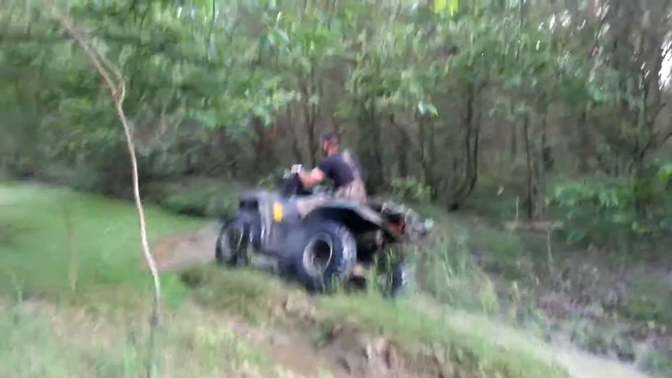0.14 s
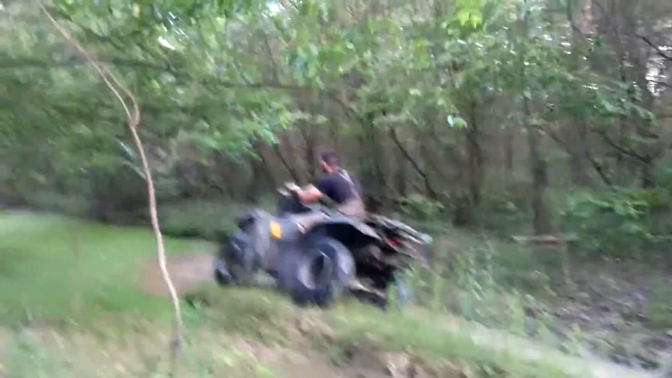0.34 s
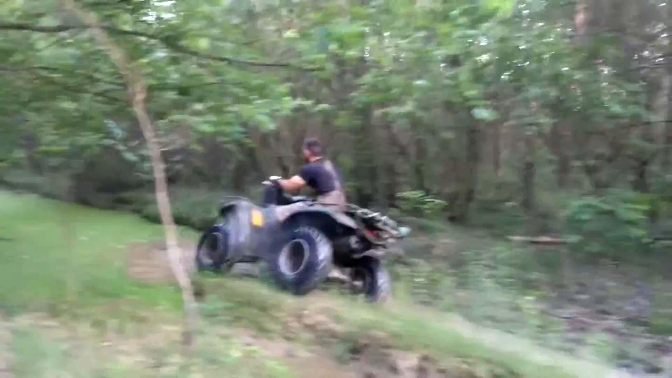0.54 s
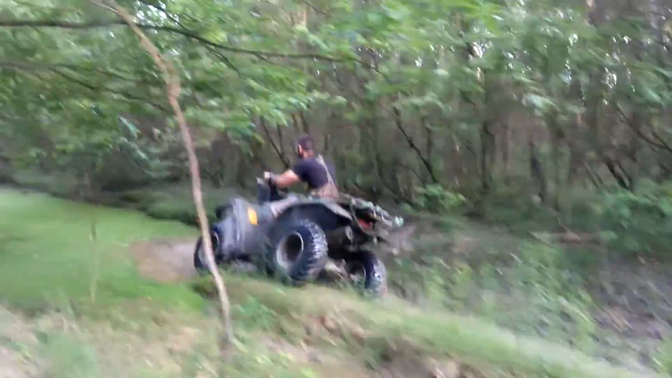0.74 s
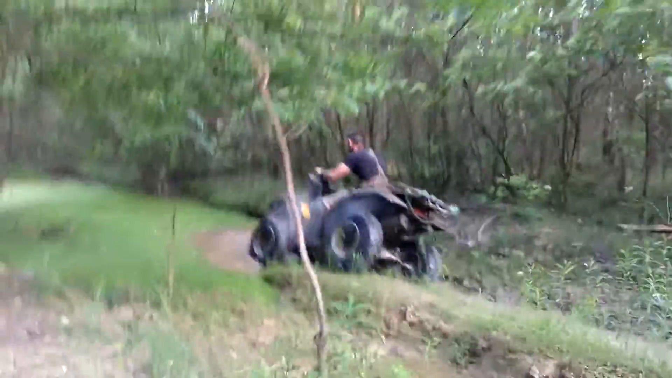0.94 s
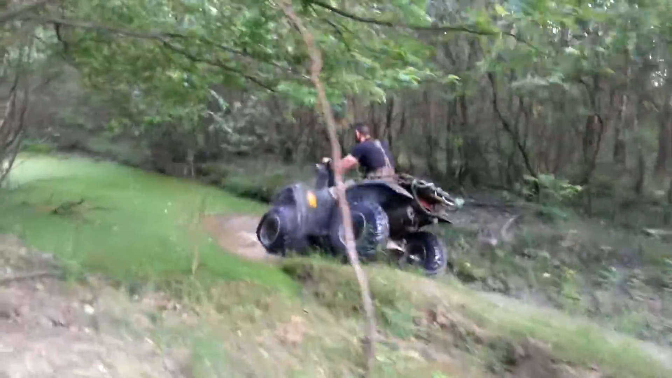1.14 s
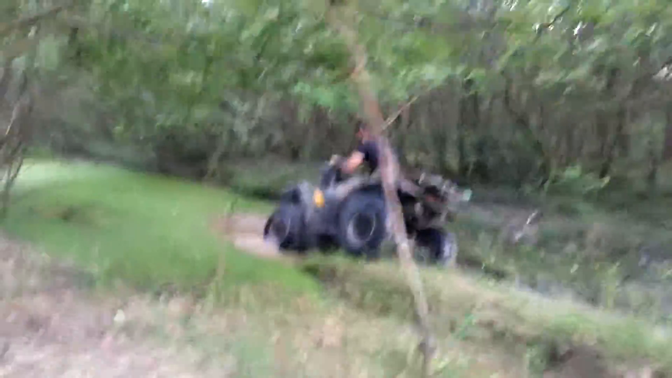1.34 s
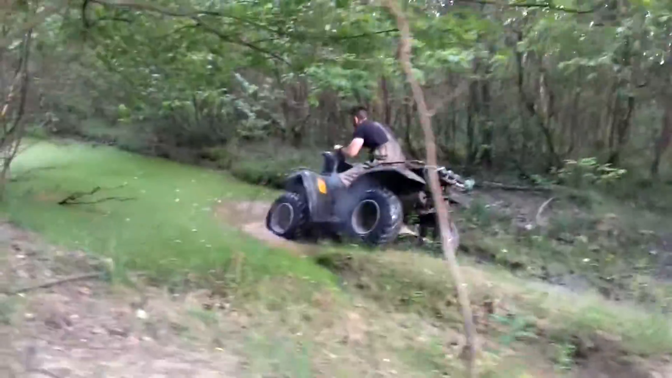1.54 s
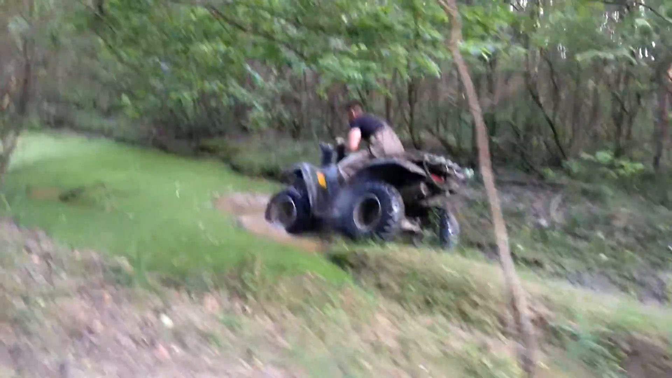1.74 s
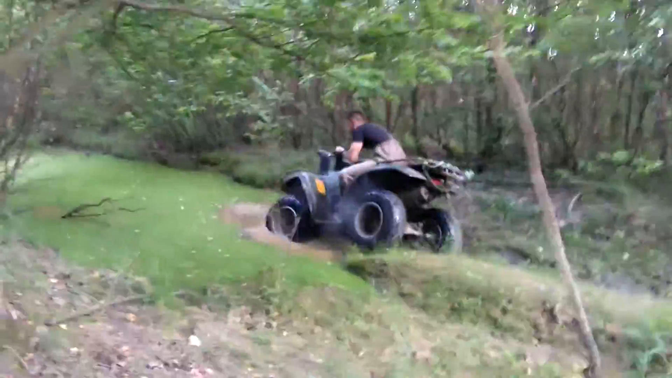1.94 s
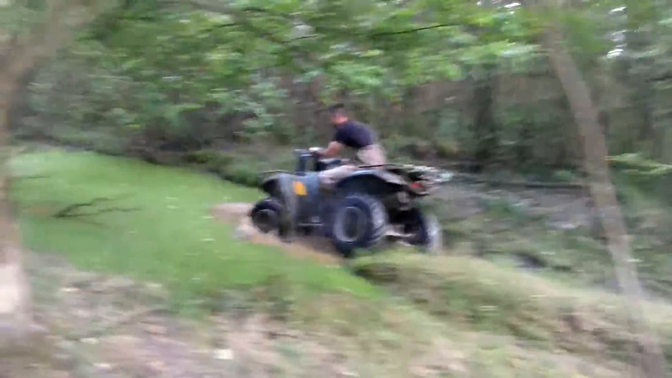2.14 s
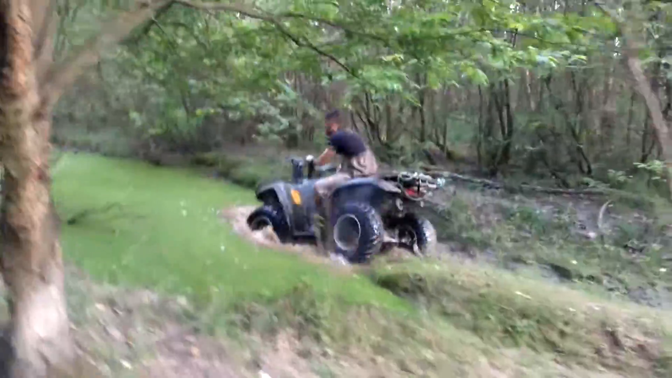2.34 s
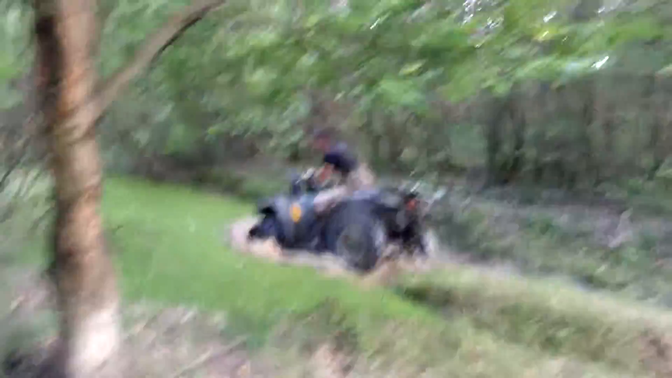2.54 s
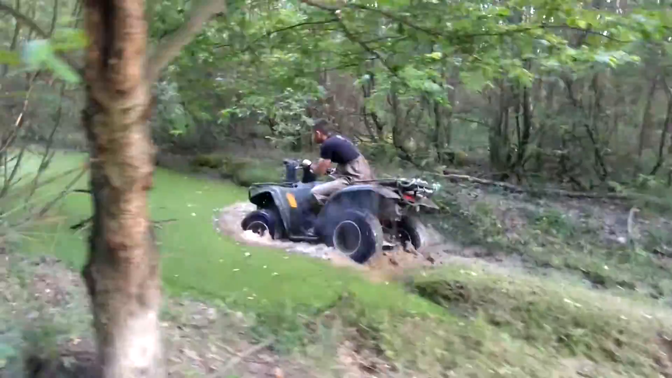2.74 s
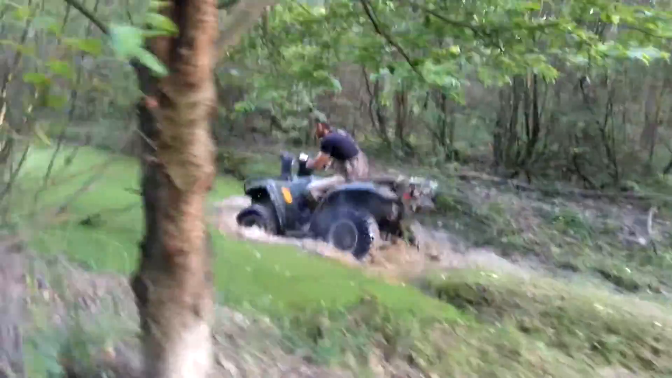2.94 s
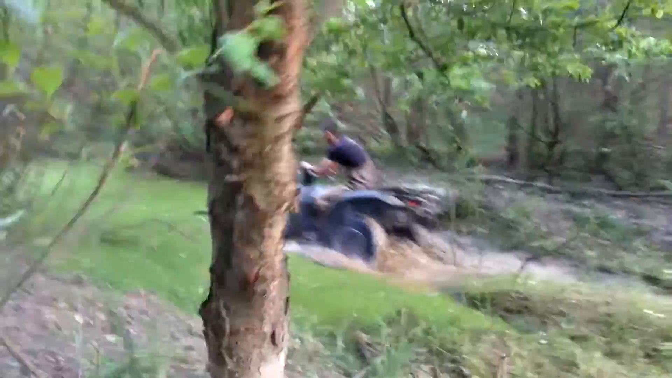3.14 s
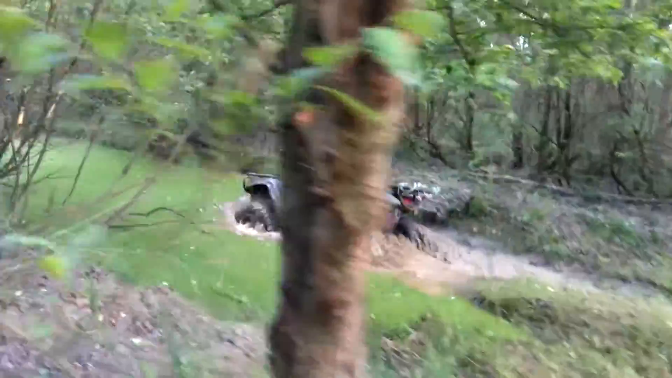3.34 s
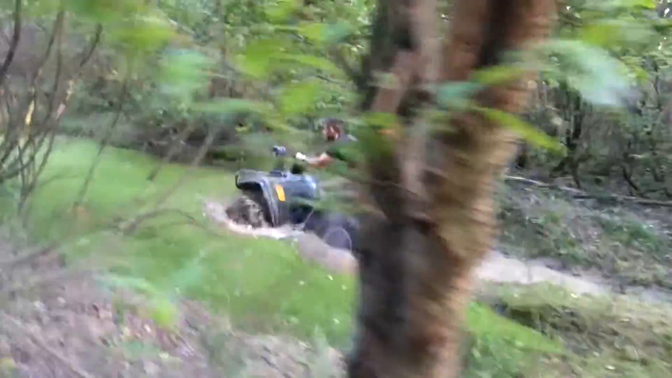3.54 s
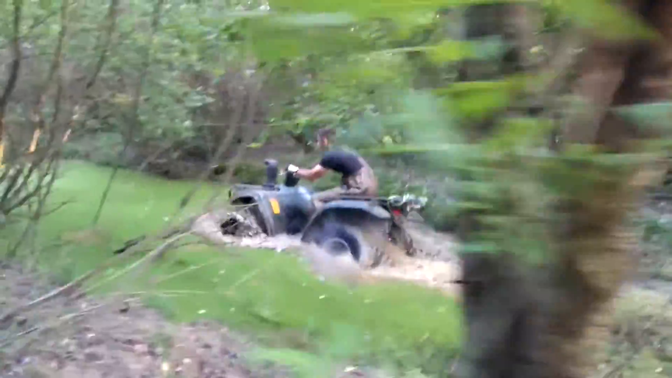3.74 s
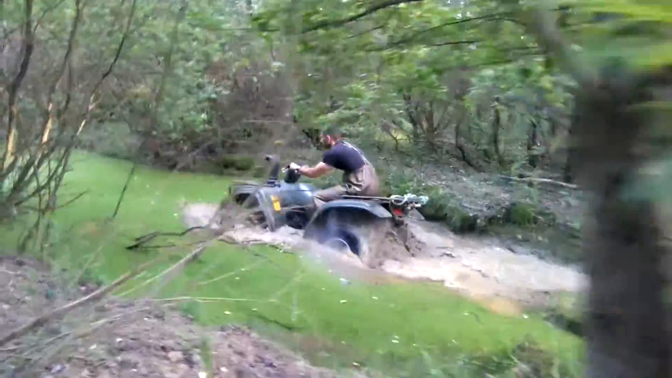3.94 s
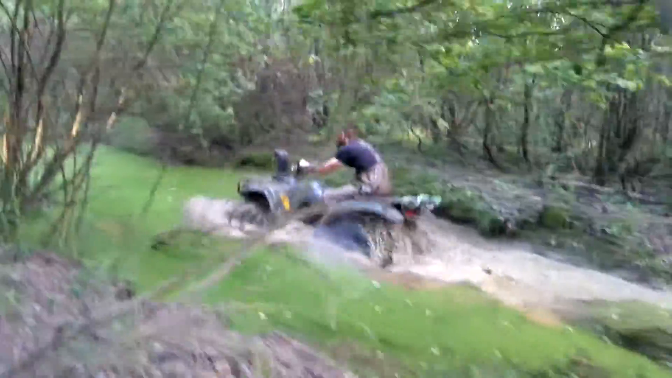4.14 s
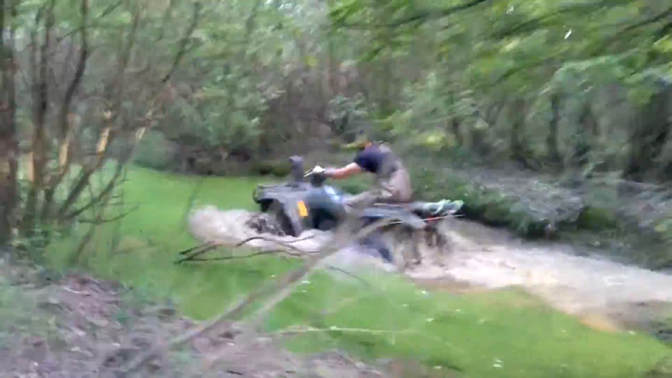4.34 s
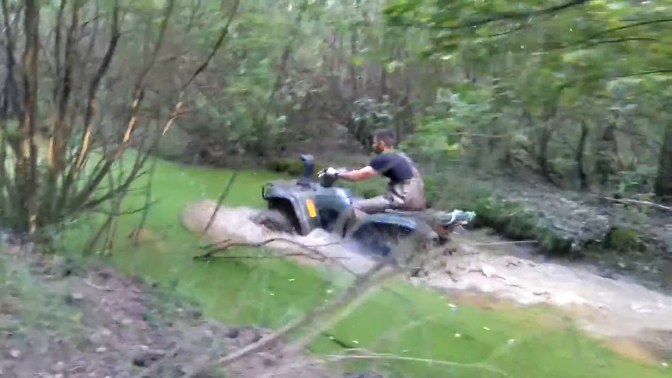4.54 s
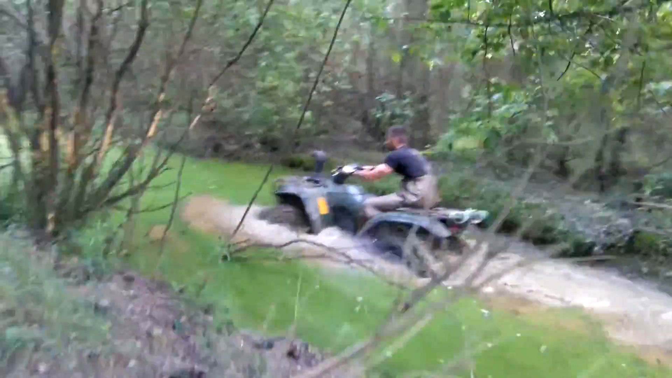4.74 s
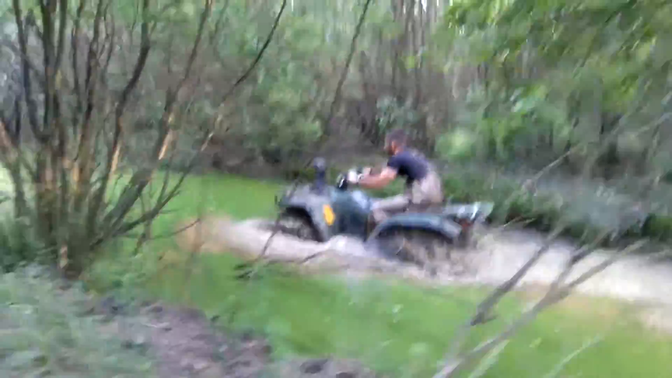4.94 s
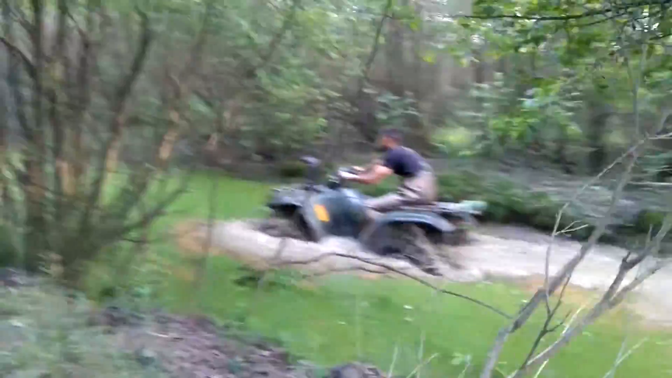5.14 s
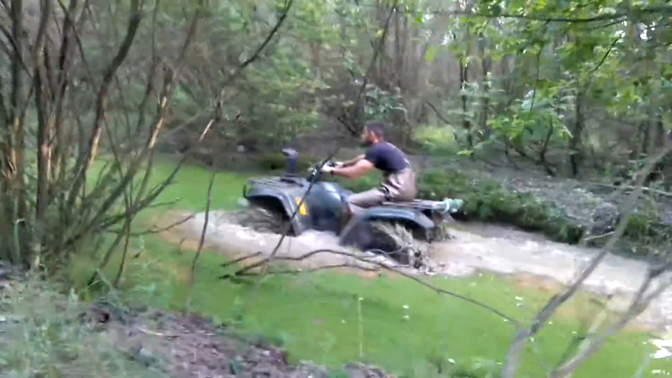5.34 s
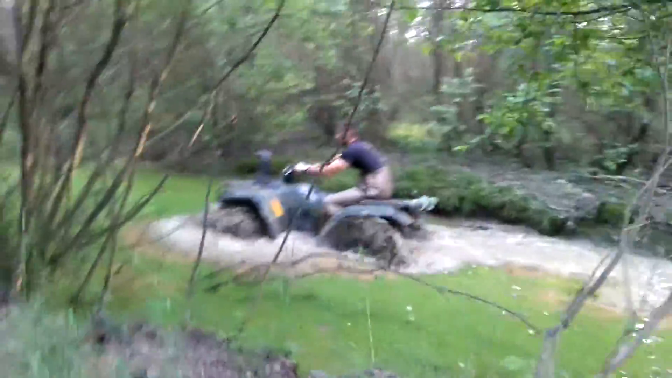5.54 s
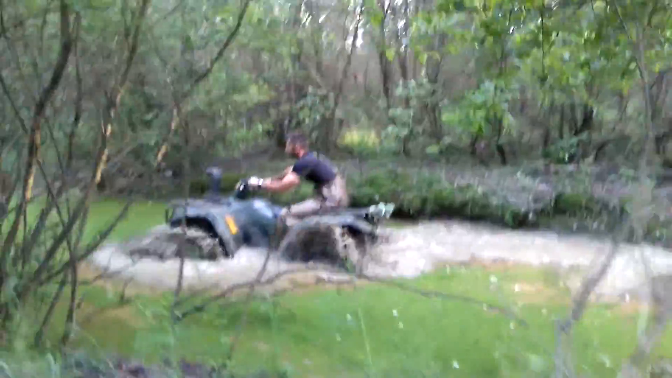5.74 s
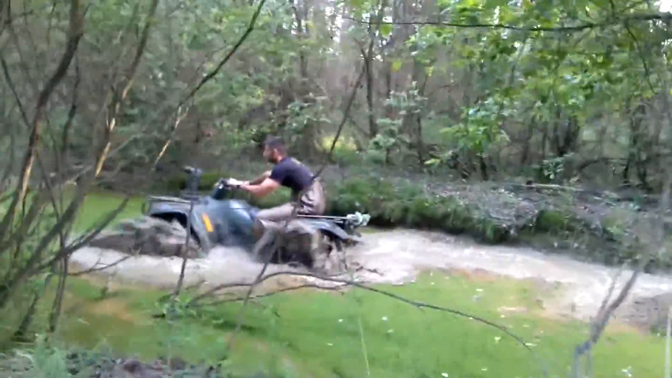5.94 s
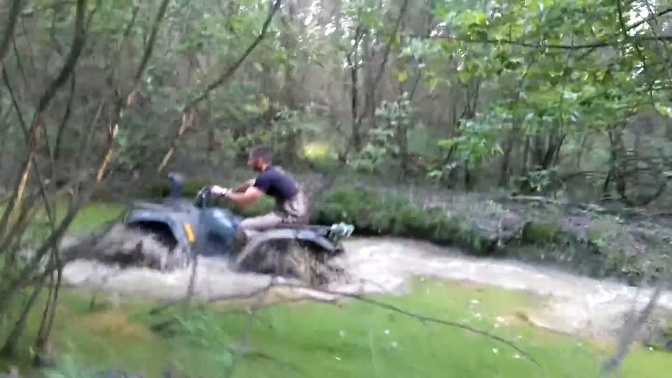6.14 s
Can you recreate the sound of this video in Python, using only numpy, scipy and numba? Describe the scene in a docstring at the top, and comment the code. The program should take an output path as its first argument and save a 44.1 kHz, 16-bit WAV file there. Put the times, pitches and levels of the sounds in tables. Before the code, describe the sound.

Throaty quad bike revs up, drops, revs again, then holds a loud rising blare over a constant wash of thrown water in woodland.

```python
"""A single-cylinder four-stroke quad blips its throttle twice on a bank, then pulls hard through deep muddy
water in a wood. Each firing cracks at the exhaust valve, leaves the silencer a moment later, is pushed on by
the piston and blows a burst of hissing gas through the tailpipe; the intake thumps half a cycle on.
Pulling hard, the pulses merge into a clean note, a sum of sines on the firing rate.
Engine clatter and thrown water, a steady grainy noise, fill the gaps."""
import sys
import numpy as np
from scipy import signal
from scipy.fft import rfft, irfft
from scipy.io import wavfile
from scipy.ndimage import uniform_filter1d
from numba import njit

SR = 44100
rng = np.random.default_rng(int(sys.argv[2]) if len(sys.argv) > 2 else 0)


def transcribe(u):
    """Save the signal u as a 16-bit wav file named by the first command-line argument.

    u: samples, shape (n,) or (channels, n), limited to [-1, 1]; the rate is SR.
    q: integer samples, one column per channel.
    """
    v = np.clip(np.atleast_2d(u).T, -1, 1)
    q = np.round(v * 32767).astype(np.int16)
    wavfile.write(sys.argv[1], SR, q)


N = 273420  # samples, 6.2 s

# Pressure pulses of one engine cycle. Each row: share of the cycle at which it starts, travel time in ms,
# relative strength in dB in the thud, boom, drone (airbox) and bark (header), dB added when the engine
# is slow, and a signed size factor.
CYCLE_PULSES = [(0, 7.21, -12, -9, 6, 8.5, 13.5, 0.25), (0, 15.2, 25, 18, 15.5, 15.5, -4, 0.55),
                (0.37, 6.266, 4, -7.5, -16, -10.5, 19.5, 1.3),
                (0.497, 5.95, -21, -25, 11.5, 12.5, -2, -0.63), (0.76, 7.66, -18, -11, -1, -8, -13, 1.7)]
# Resonances of the header pipe. Each row: centre in Hz, width in Hz, level in dB.
HEADER_MODES = [(528, 139, 0.5), (645, 280, 3), (856, 180, 2.5), (1230, 420, -4.5)]
# The blips also even out at the top. Each row: start and end of the fade in, then of the fade out, in s.
BLIP_TOPS = [(.33, .45, 0.614, .65), (1.864, 1.99, 2.25, 2.27)]
# When the clean note replaces the separate pulses for good: start and end of the fade in seconds.
NOTE_TAKEOVER = (2.71, 2.955)


def from_db(db):
    """Decibels to gain."""
    return 10 ** (np.asarray(db) / 20)


def rms_one(x):
    """Scale to rms 1."""
    return x / np.sqrt(np.mean(x ** 2) + 1e-20)


def evened(x):
    """Scale to rms 1 over a few engine cycles."""
    power = uniform_filter1d(uniform_filter1d(x ** 2, size=SR // 5), size=SR // 5)
    return x / np.sqrt(power + 1e-20)


def in_time(rows):
    """Columns of a curve at every sample; the first column is the time in seconds."""
    s, *columns = np.transpose(rows)
    return [np.interp(np.arange(N) / SR, s, c) for c in columns]


def at_hz(points):
    """A (Hz, value) table on the FFT grid, joined evenly in pitch."""
    hz, value = np.transpose(points)
    return np.interp(np.log(np.fft.rfftfreq(N, 1 / SR) + 1), np.log(hz), value)


def drift(rate_hz):
    """Slow random wandering of spread 1, made at every 40th sample and joined up."""
    r = np.exp(-80 * np.pi * rate_hz / SR)
    slow = signal.lfilter([1], [1, -2 * r, r * r], rng.standard_normal(N // 40 + 2002))[2000:]
    return np.interp(np.arange(N) / 40, np.arange(len(slow)), rms_one(slow))


def resonate(x, modes):
    """Resonances (Hz, width Hz, dB) side by side, signs alternating."""
    out = 0
    for k, (hz, width_hz, db) in enumerate(modes):
        r = np.exp(-np.pi * width_hz / SR)
        poles = [1, -2 * r * np.cos(2 * np.pi * hz / SR), r * r]
        ring = (1 - r * r) / 2 * signal.lfilter([1, 0, -1], poles, x + 1e-18)
        out = out + (-1) ** k * from_db(db) * ring
    return out


@njit
def moving_ring(x, hz, width_hz, rate):
    """A resonance whose centre and width change while it rings."""
    out = np.zeros(len(x))
    for i in range(2, len(x)):
        r = np.exp(-np.pi * width_hz[i] / rate)
        ring = 2 * r * np.cos(2 * np.pi * hz[i] / rate) * out[i - 1] - r * r * out[i - 2]
        out[i] = (1 - r * r) / 2 * (x[i] - x[i - 2]) + ring
    return out


def band(x, low_hz, high_hz):
    """Band-pass."""
    return signal.sosfilt(signal.butter(2, [low_hz, high_hz], "band", fs=SR, output="sos"), x)


def stereo_noise(spectrum_db):
    """Two noises whose likeness depends on pitch, nearly unrelated at the top."""
    # Each row: frequency in Hz, likeness of left and right (0 unrelated, 1 equal).
    left_right_likeness = [(60, 0.19), (150, 0.11), (380, 0.82), (940, 0.66), (2340, 0.48), (5860, 0.037),
                           (14700, 0.043)]
    mid, side = rfft(rng.standard_normal((2, N)))
    alike = np.clip(at_hz(left_right_likeness), 0, 1)
    both = np.sqrt(1 + alike) * mid + np.sqrt(1 - alike) * side * [[1], [-1]]
    return rms_one(irfft(both * from_db(spectrum_db), N))


def struck(events, modes):
    """Clicks at (s, peak dB) set the modes ringing."""
    clicks = np.zeros(N)
    s, db = np.transpose(events)
    clicks[(s * SR).astype(int)] = from_db(db)
    one_click = resonate(signal.unit_impulse(SR // 10), modes)
    return resonate(clicks, modes) / np.abs(one_click).max()


def firings(cycle, share_late):
    """Number of the current firing and the sample where it began, this share of a cycle late."""
    number = np.floor(cycle - share_late).astype(int)
    starts = np.flatnonzero(np.diff(number, prepend=number[0] - 1))
    return number, starts[number - number[0]]


def by_course(rows):
    """Each row's value, moved by the machine's turn and by the water over the silencer."""
    # The way through the wallow. Each row: time in s, tailpipe turned this way (about 0-1),
    # silencer under water (0-1).
    course = [(0, 0, 0), (2.75, 0.36, 0.08), (3.1, 0.74, 0), (3.4, 0.95, 0.3), (3.7, 0.93, 0.25),
              (4, 1, 0.48), (4.4, 1.02, 1), (5, 0.93, 0.7), (5.3, 1, 0.8), (5.65, 0.77, 0.9),
              (6.2, 0.66, 0.9)]
    turned, sunk = in_time(course)
    return [value + by_turn * turned + by_water * sunk for value, by_turn, by_water in rows]


def part_levels(per_s, throttle):
    """Level in dB of every part from speed, throttle and course."""
    # Parts: thud, boom, drone, bark, crack, rasp, jet, clatter. Each row: level in dB when pulling,
    # dB per octave of slower firing, dB with shut throttle, dB when turned this way, dB under water.
    parts = {"thud": (-25, -7, -1.5, -4.5, 1), "boom": (-18, -7, -7.5, 3, -17),
             "drone": (-17, -4.5, -8, -1, 2.5), "bark": (-16, -11, -11.5, -6, 0.5),
             "crack": (-24, -7, -13, 8, -5), "rasp": (-33, -11, -9.5, 16, 1.5),
             "jet": (-23, -8.5, -17.5, 6.5, 2), "clatter": (-32.5, -17.5, 6, 10, 3)}
    pulling_per_s = 27.9  # below this firing rate the levels depend on speed
    slower = np.maximum(np.log2(pulling_per_s / per_s), 0)
    rows = parts.values()
    placed = by_course([(row[0], *row[3:]) for row in rows])
    return [db + row[1] * slower + row[2] * (1 - throttle) for row, db in zip(rows, placed)]


def clatter_and_water(db):
    """Engine clatter and thrown water: a grainy wash of noise that never stops."""
    # Each row: frequency in Hz, relative level in dB per Hz.
    wash_spectrum = [(530, -3), (900, -7.5), (2100, 3), (2420, 2), (2690, 3.5), (2990, 2), (4310, -5.5),
                     (6060, -4), (7580, -2), (9930, -6.5), (12900, -13.5), (14300, -24), (15000, -77)]
    sway_db = 1.2 * drift(2.2)
    grain_db = 2.0 * drift(61)
    return from_db(db + sway_db + grain_db) * stereo_noise(at_hz(wash_spectrum))


def wood(x):
    """Tree trunks and bank send back a few dull, delayed copies."""
    # Each row: delay in ms, left level in dB, right level in dB.
    echoes = [(17.066, -16, -11), (30.7, -11.5, -93), (50.1, -38, -20), (70.6, -30, -52), (112, -53, -51)]
    dull = signal.lfilter([.3], [1, -.7], x)
    out = np.zeros((2, N))
    for ms, *db in echoes:
        lag = int(ms * SR / 1000)
        out[:, lag:] += from_db(db)[:, None] * dull[:, :-lag]
    return out


def ground(x):
    """One close reflection off ground and water, a delayed copy whose delay follows the machine."""
    # Each row: time in s, delay in ms, level in dB.
    reflection = [(0, 0.63, -35), (1.7, 0.94, -29), (2.9, 0.75, -9), (3.3, 0.43, -28), (3.7, 0.49, -17),
                  (4.1, 1.46, -12), (4.4, 1.464, -10), (5.2, 1.66, -25), (5.8, 1.44, -17), (6.2, 1.6, -13)]
    ms, db = in_time(reflection)
    at = np.arange(N) - ms * SR / 1000
    return from_db(db) * np.array([np.interp(at, np.arange(N), side) for side in x])


def metal_tinks():
    """A small metal part rings at one pitch each time it is struck."""
    # Each row: time in s, peak level in dB.
    tinks = [(0.1191, -21), (0.1774, -11), (0.2149, -17), (0.3716, -17), (0.4874, -33), (0.5691, -25)]
    # Each row: pitch in Hz, width in Hz, level in dB.
    tink_modes = [(5170, 91, -1)]
    return struck(tinks, tink_modes)


def overrun_pops(throttle):
    """Unburnt fuel pops in the header: clicks at set times, and small random ones at shut throttle."""
    # Each row: time in s, peak level in dB ahead of the band-pass.
    pops = [(0.684, -12), (0.7, -7.5), (0.73, -8), (0.796, -10), (0.843, -7.5), (1.055, -16), (1.196, -17),
            (1.278, -16), (1.419, -22), (1.593, -15), (2.335, -12), (2.398, -17), (2.617, -23),
            (2.679, -10)]
    small_per_s, small_db = 8, -22  # rate with the throttle fully shut; peak ahead of the band-pass
    small = np.flatnonzero(rng.random(N) < small_per_s * (1 - throttle) / SR) / SR
    return band(struck(pops + [(s, small_db) for s in small], HEADER_MODES), 450, 1370)


def repeating_noise(cycle):
    """Noise that restarts with each firing, turning slowly between two patterns."""
    turns_per_s = 0.5997
    _, start = firings(cycle, .012)
    patterns = rng.standard_normal((2, SR // 5))[:, np.arange(N) - start]
    angle = 2 * np.pi * turns_per_s * np.arange(N) / SR
    return np.cos(angle) * patterns[0] + np.sin(angle) * patterns[1]


def jet_hiss(jet, again, shock, throttle):
    """Gas hisses in the open air: noise shaped by the flow, plus the treble of the valve shock."""
    # Each row: frequency in Hz, relative level in dB per Hz.
    jet_spectrum = [(2530, -1.5), (4300, 3), (5240, 6), (5670, 1), (6040, 4), (8090, -0.5), (9130, -2.5),
                    (10300, -5.5), (12200, -10), (14300, -10.5), (14700, -31), (15000, -53)]
    spectrum_db = at_hz(jet_spectrum)
    repeated = rms_one(irfft(rfft(again) * from_db(spectrum_db), N))
    hiss = stereo_noise(spectrum_db) + from_db(-5.5) * throttle * repeated
    return jet * hiss + from_db(-17) * band(shock, 3200, 9800)


def outlet_rasp(puff):
    """The outlet's resonances rasp as the gas passes."""
    # Each row: centre in Hz, width in Hz, level in dB.
    outlet_modes = [(2995, 120, 1.4), (3333, 290, 4.2), (3947, 290, 8.3), (4630, 400, 2.1)]
    # Which of them reaches this way. Each row: time in s, dB added to each of the four.
    outlet_heard = [(0, 19, 5, 1.5, -0.6), (3.05, 5, 4, 0.5, 0), (3.22, 17, 6, 1.5, 0),
                    (3.4, -5, -3, 1.5, 0.27), (3.8, -7, 0, -5, -0.2), (4.15, -8, -2, 1.5, -0.33),
                    (4.4, 7, 4, 3, -2), (4.7, -3, 2.5, -0.5, -1.8), (5.1, -9, 2.5, 0, -1.4),
                    (5.5, -4, 1, -1, 0.75), (6.2, -7, -4, 3.5, 0.28)]
    out = 0
    for k, (mode, db) in enumerate(zip(outlet_modes, in_time(outlet_heard))):
        out = out + (-1) ** k * from_db(db) * resonate(puff, [mode])
    return band(out, 2330, 6400)


def tailpipe_crack(blast, throttle):
    """Three tailpipe resonances ring; they shift with the hot gas and blur with shut throttle."""
    # Each row: time in s, centre of each of the three resonances in Hz.
    pipe_hz = [(0, 1633, 1980, 2474), (2.798, 1514, 1820, 2350), (3.3, 1600, 1820, 2365),
               (3.7, 1600, 1930, 2500), (4, 1620, 1960, 2630), (4.3, 1600, 1900, 2500),
               (4.6, 1660, 2070, 2470), (5, 1620, 1880, 2484), (5.6, 1620, 1880, 2470),
               (6.2, 1620, 1900, 2430)]
    # Their widths in Hz at full throttle.
    pipe_widths = (90, 110, 130)
    # Which of them reaches this way as the machine turns. Each row: time in s, level of each in dB.
    pipe_heard = [(0, -3, -11, -0.5), (0.549, 5.5, -1, 2.5), (1.4, -1, -7, -0.5), (2.15, 1, -4, -2),
                  (2.8, 2.5, -1, 3), (3.2, 1.5, -2, -3), (3.6, 7.5, 3, 2.5), (4, -1, 6.5, 7.5),
                  (4.4, -22, -3, -4.5), (4.8, -4, -8.5, 0), (5.2, -8, -3, -0.5), (5.6, -4.5, -0.5, 0),
                  (6.2, 11, -10, -5)]
    blur = 1 + 2.5 * (1 - throttle)
    out = 0
    for k, (hz, width_hz, db) in enumerate(zip(in_time(pipe_hz), pipe_widths, in_time(pipe_heard))):
        ring = np.array([moving_ring(side, hz, width_hz * blur, SR) for side in blast])
        out = out + (-1) ** k * from_db(db) * ring
    return evened(band(out, 1190, 4360))


def gas(cycle, per_s, throttle, levels_db):
    """Hiss that follows the gas flow, led by the shock of the opening valve; also returns the flow."""
    # Flow through one cycle. Each row: share of the cycle, relative crack, rasp and jet level in dB.
    cycle_flow = [(0, 2.5, -23, 0), (0.014, 5.5, -8, -0.5), (.07, 0.5, -16, 5.5), (.13, -1.5, -3.5, 1.5),
                  (0.298, -6.5, 3.5, 0), (.36, 2.5, -56, -1.5), (.45, 1, -1.5, 4.5), (.62, -5, -1, 0),
                  (.74, -16.5, -13, -6.5), (0.997, -18, -14, -15.5), (1, -2, -16, -5)]
    share, *flows_db = np.transpose(cycle_flow)
    firing_db = 1.03 * rng.standard_normal(int(cycle[-1]) + 2)[cycle.astype(int)]
    eddies_db = firing_db + 1.2 * drift(330)
    depth = .25 + .75 * throttle  # a shut throttle leaves only a weak, even flow
    crack, rasp, jet = [evened(from_db(depth * np.interp((cycle - .012) % 1, share, db) + eddies_db))
                        for db in flows_db]
    opens = np.diff(np.floor(cycle - .02), prepend=0) > 0
    shock = throttle * np.sqrt(SR / per_s) * from_db(firing_db) * opens
    at_outlet = np.roll(shock, int(2.6 * SR / 1000))  # the shock gets to the outlet 2.6 ms later
    again = from_db(-4) * throttle * repeating_noise(cycle)
    blast = crack * (stereo_noise(0) + again) + from_db(-2.5) * shock
    puff = rasp * (stereo_noise(0) + again) + from_db(-4.5) * at_outlet
    layers = [tailpipe_crack(blast, throttle), outlet_rasp(puff), jet_hiss(jet, again, shock, throttle)]
    return sum(from_db(db) * rms_one(x) for x, db in zip(layers, levels_db)), crack


def chirps(cycle, throttle):
    """Each firing whistles upward as the gas jet speeds up: a short rising sine."""
    # Each row: time in s, top of the whistle in Hz, level in dB.
    whistle = [(0, 2700, -21), (.6, 2700, -16), (1.6, 2800, -21), (2.2, 3000, -14), (2.7, 3100, -17),
               (3.1, 3400, -13), (3.28, 3950, -3), (3.52, 4000, -3), (3.65, 3700, -14), (4.2, 3450, -8),
               (4.6, 3450, -8), (5.1, 3400, -14), (5.6, 3900, -17), (6.2, 4100, -16)]
    # It reaches the left port best: dB left, then right.
    whistle_sides = [
        [2],
        [-8],
    ]
    start_hz, rise_ms, attack_ms, length_ms = 1300, 1.9, .4, 7.5
    shut_db, swell_db = -28, 26  # at shut throttle; rise in dB as the pitch goes from 0 to the top
    top_hz, db = in_time(whistle)
    firing, start = firings(cycle, .02)
    ms = (np.arange(N) - start) * 1000 / SR
    strong, sharp = rng.standard_normal((firing[-1] + 2, 2))[firing].T
    hz = top_hz * (1 + 0.027 * sharp) - (top_hz - start_hz) * np.exp(-ms / rise_ms)
    turns = np.cumsum(hz) / SR
    shape = (1 - np.exp(-ms / attack_ms)) * np.exp(-(ms / length_ms) ** 4)
    level_db = db + shut_db * (1 - throttle) + swell_db * (hz / top_hz - 1)
    level_db = level_db + 0.8 * strong + 0.5 * drift(247)
    return from_db(level_db + whistle_sides) * shape * np.sin(2 * np.pi * (turns - turns[start]))


def takeover(blips=True):
    """0 while single pulses are heard, 1 once the engine fires evenly."""
    t = np.arange(N) / SR
    tops = sum(np.interp(t, span, [0, 1, 1, 0]) for span in BLIP_TOPS) if blips else 0
    return np.interp(t, NOTE_TAKEOVER, [0, 1]) + tops


def pulses(cycle, per_s, throttle, luck, uneven, column):
    """Click train of all pressure pulses; no two firings are quite alike."""
    out = np.zeros(N + SR)
    uneven_db, jitter_ms = .7 + 3 * uneven, .04 + .7 * uneven
    firing_shut_db = -0.5  # firing pulses are very slightly weaker with shut throttle
    slow = np.clip((33 - per_s) / 8, 0, 1)  # valve and piston stroke stand out while the engine is slow
    for row, (early, strong) in zip(CYCLE_PULSES, luck[:, :, cycle.astype(int)]):
        at = np.flatnonzero(np.diff(np.floor(cycle - row[0])) > 0) + 1
        late = np.maximum(row[1] + jitter_ms[at] * early[at], 0) * SR / 1000
        db = row[column] + uneven_db[at] * strong[at] + slow[at] * row[-2]
        if row[0] < .1:
            db = db + firing_shut_db * (1 - throttle[at])
        out[(at + late).astype(int)] += row[-1] * from_db(db)
    return out[:N]


def pressure_waves(cycle, per_s, throttle, flow, levels_db):
    """Pulses and a share of turbulence ring silencer, airbox and header; slow or throttled, unevenly."""
    # Resonances of the silencer. Each row: centre in Hz, width in Hz, level in dB.
    silencer_modes = [(76, 70, 2), (107.4, 24, 3)]
    # Main resonances, shifting as hot gas fills the pipes, the machine turns and water closes over
    # them. Each row: time in s, centre of boom, drone and bark in Hz.
    body_hz = [(0, 117, 235, 656), (.55, 142, 284, 860), (1.4, 140, 276, 850), (2.15, 130, 282, 1150),
               (2.8, 150, 280, 1010), (3.1, 170, 293, 920), (3.4, 190, 315, 855), (3.7, 198, 328, 560),
               (4, 160, 356, 530), (4.6, 146, 336, 520), (5, 139, 268, 710), (5.35, 135, 288, 620),
               (5.7, 142, 296, 680), (6.2, 143, 300, 760)]
    # Widths of boom, drone, bark. Each row: Hz, Hz added when turned this way, Hz added under water.
    body_widths = [(84, -30, 26), (77.5, 30, 95), (458, 118, -36)]
    # Thud, boom, drone and bark are each moved earlier by this many ms to make up for filter delay.
    earlier_ms = (10, 9, 7.5, 6)
    # Header pulses still heard above the clean note. Each row: time in s, level in dB against the bark.
    header_top = [(2.7, -4), (2.95, 1.5), (3.3, -6), (3.55, 1), (3.85, 0), (4.05, -4), (4.5, -8), (4.7, 2),
                  (5, -4), (5.5, -8), (6.2, -7)]
    uneven = np.clip((30 - per_s) / 30 + .6 * (1 - throttle), 0, 1)
    boom_hz, drone_hz, bark_hz = in_time(body_hz)
    boom_width, drone_width, bark_width = by_course(body_widths)
    bodies = [lambda x: band(resonate(x, silencer_modes), 19, 130),
              lambda x: band(moving_ring(x, boom_hz, boom_width, SR), 106, 220),
              lambda x: band(moving_ring(x, drone_hz, drone_width, SR), 160, 384),
              lambda x: band(moving_ring(resonate(x, HEADER_MODES), bark_hz, bark_width, SR), 370, 1380)]
    shares = [(.02, .25), (.02, .3), (.06, .4), (.12, .75)]  # turbulence 0-1 when firing evenly, unevenly
    luck = rng.standard_normal((len(CYCLE_PULSES), 2, int(cycle[-1]) + 2))
    out = 0
    for k, (body, (even_share, uneven_share), db) in enumerate(zip(bodies, shares, levels_db)):
        clean = evened(body(pulses(cycle, per_s, throttle, luck, uneven, column=2 + k)))
        clean = np.roll(clean, -int(earlier_ms[k] * SR / 1000))
        rough = evened(body(flow * rng.standard_normal(N)))
        share = even_share + (uneven_share - even_share) * uneven
        even = takeover(blips=k < 3)
        rough_gain = np.sqrt(share) * from_db(-9 * even)  # flow noise drops 9 dB while it fires evenly
        out = out + from_db(db) * (np.sqrt(1 - share) * (1 - even) * clean + rough_gain * rough)
    # after the loop, db, even and clean are those of the bark
    return out + from_db(db + in_time(header_top)[0]) * even * band(clean, 976, 1410)


def clean_note(cycle, per_s):
    """Sines on the firing rate, phased as one sudden pulse that rings out (minimum phase)."""
    # The note's make-up, stage by stage. Each row: multiple of the firing rate, relative level in dB.
    blipping_note = [(1, -44), (2, -20), (3, -15), (4, -6.5), (5, -7), (6, 1), (7, -4.5), (8, -2.5),
                     (9, -5.5), (10, -7.5), (11, 1), (12, 1.5), (13, -8), (14, -8.5), (15, -25), (16, -13),
                     (17, -11.5), (18, -14), (19, -28), (20, -18), (21, -10), (22, -24), (23, -14),
                     (24, -31), (25, -22)]
    away_note = [(1, -32), (2, -17), (3, -18), (4, -7), (5, -5.5), (6, 2), (7, -17), (8, -2), (9, -11),
                 (10, -11), (11, -3.5), (12, -4), (13, -3.5), (14, -19), (15, -14), (16, -26), (17, -12),
                 (18, -26), (19, -13), (20, -20), (21, -10), (22, -29), (23, -23), (24, -23), (25, -16)]
    gaining_note = [(1, -23), (2, -16), (3, -21), (4, -11), (5, 0.5), (6, 0.5), (7, -15), (8, -17.5),
                    (9, -2), (10, -7), (11, -7.5), (12, -14), (13, -23), (14, -17), (15, -11.5), (16, -23),
                    (17, -16), (18, -28), (19, -23.5), (20, -28), (21, -27), (22, -26), (23, -19),
                    (24, -21), (25, -17.5)]
    climbing_note = [(1, -14), (2, -12.5), (3, -14), (4, -5), (5, 1), (6, 0), (7, -9), (8, -25), (9, -1.5),
                     (10, -11), (11, -25), (12, -14), (13, -18), (14, -13), (15, -9), (16, -18), (17, -12),
                     (18, -24), (19, -29), (20, -11), (21, -19), (22, -18), (23, -15), (24, -23), (25, -15)]
    sunk_note = [(1, -14), (2, -5.5), (3, -2), (4, 0.5), (5, -1), (6, -20), (7, -1.5), (8, 2), (9, -2),
                 (10, 2.5), (11, -9), (12, -0.5), (13, -4), (14, -1.5), (15, -3.5), (16, -11), (17, -19),
                 (18, -9), (19, -10), (20, -2.5), (21, -6), (22, -3.5), (23, -7), (24, -10), (25, -27)]
    wading_note = [(1, -7), (2, -13), (3, -3.5), (4, -3), (5, -3.5), (6, -2), (7, 2), (8, -0.5), (9, -9.5),
                   (10, -3.5), (11, -18), (12, -6), (13, -6.5), (14, -5), (15, -12), (16, -7), (17, -17),
                   (18, -14), (19, -19), (20, -6), (21, -17), (22, -12), (23, -3), (24, -7), (25, -19)]
    out_note = [(1, -17.5), (2, -21), (3, -5), (4, -4.5), (5, -9.5), (6, -4.5), (7, 1), (8, -3.5), (9, -7),
                (10, -6.5), (11, -13), (12, -8), (13, -17), (14, -8.5), (15, -20.5), (16, -9), (17, -13.5),
                (18, -11.5), (19, -13), (20, -11), (21, -12), (22, -12.5), (23, -10), (24, -20.5),
                (25, -15.5)]
    # Times in s: blipping until, pulling away, gaining, climbing, sunk from, to, wading from, to,
    # climbing out from.
    stage_times = (2.4, 2.9, 3.27, 3.62, 3.95, 4.55, 4.8, 5.1, 5.45)
    # Level of the whole note. Each row: time in s, level in dB.
    note_level = [(.4, -15.5), (.6, -16), (1.9, -14), (2.2, -16.5), (2.7, -9), (2.95, -14.5), (3.4, -15.5),
                  (3.72, -16), (3.95, -21), (4.5, -19), (4.94, -17.5), (5.26, -19), (5.54, -15.5),
                  (6.2, -15)]
    # Unsteadiness added toward the top multiples. Each row: time in s, spread in dB.
    upper_waver = [(2.7, 5), (3.5, 4), (3.9, 2), (4.6, 1), (5.1, 1), (5.3, 5), (6.2, 4)]
    late_ms, blip_late_ms = 8.8, 2.5  # delay after the valve opens; added delay in the blips
    lows_late_ms = 22.26  # the sound around multiple m comes later by this divided by m
    wander_cycles = .0016

    stages = (blipping_note, away_note, gaining_note, climbing_note, sunk_note, wading_note, out_note)
    logs = np.log(from_db([np.transpose(rows)[1] for rows in stages]))
    logs = logs - np.log(np.sum(np.exp(2 * logs), axis=1, keepdims=True) / 2) / 2  # rms 1
    padded = np.pad(logs, ((0, 0), (1, 8)), mode="edge")
    mirrored = np.hstack([padded, padded[:, -2:0:-1]])
    phases = -signal.hilbert(mirrored).imag[:, 1:]
    phases[0] = phases[0] * 1.15  # in the blips the pulse rings longer

    t = np.arange(N) / SR
    stage = [0, 1, 2, 3, 4, 4, 5, 5, 6]  # stage at each of the stage times
    waver_db = in_time(upper_waver)[0]
    blipping = np.interp(t, (BLIP_TOPS[-1][-1], NOTE_TAKEOVER[0]), [1, 0])
    turns = cycle - (late_ms + blip_late_ms * blipping) / 1000 * per_s + wander_cycles * drift(12)
    count = logs.shape[1]
    out = 0
    for k in range(count):
        unsteady_db = (0.77 + waver_db * (k / count) ** 2) * drift(5.7)
        gain = np.exp(np.interp(t, stage_times, logs[stage, k])) * from_db(unsteady_db)
        lag = lows_late_ms / 1000 * per_s * np.log(k + 1)
        phase = np.interp(t, stage_times, phases[stage, k])
        out = out + gain * np.cos(2 * np.pi * ((k + 1) * turns - lag) + phase)
    return takeover() * from_db(in_time(note_level)[0]) * out


def scene():
    """All sources at the microphone."""
    # Engine speed. Each row: time in s, firings per second.
    speed = [(0.0, 12.15), (0.11, 14.63), (0.27, 21.13), (0.54, 26.23), (0.78, 20.12), (1.37, 12.4),
             (1.62, 12.06), (1.96, 23.83), (2.18, 25.89), (2.51, 16.68), (2.7, 19.08), (2.94, 28.04),
             (3.56, 36.78), (3.99, 38.52), (4.75, 38.25), (5.13, 39.0), (5.39, 41.79), (5.72, 40.77),
             (6.2, 41.19)]
    # Each row: time in s, throttle opening (0-1).
    throttle_moves = [(0, 0.25), (.09, 0.98), (.61, 0.89), (.67, 0), (.75, 0.56), (.86, 0.44), (1.1, 0.05),
                      (1.5, 0.25), (1.63, 0.61), (1.76, 0.99), (2.22, 0.91), (2.27, 0.28), (2.36, 0.65),
                      (2.47, 0.3), (2.63, 0.25), (2.72, 1), (6.2, 0.99)]
    # The drone swells at 3.3 s, dips at 5.35 s, swells again at the end. Each row: time in s, added dB.
    drone_swell = [(0, -1), (1.3, 1), (2.2, 0), (2.9, 2.5), (3.3, 10), (3.6, 5), (4.2, 1), (4.7, 0),
                   (5.35, -6), (5.6, 5), (6.2, 8)]
    # The level of the bark wavers. Each row: time in s, added dB.
    bark_swell = [(0, -1), (.6, 0.5), (1.2, 0), (1.7, 1), (2.3, 0.5), (2.9, -0.5), (3.6, 2), (4.3, 0),
                  (5.1, 0), (5.35, 4), (5.55, 1), (5.9, 1), (6.2, 7)]
    per_s = in_time(speed)[0]
    throttle = np.clip(in_time(throttle_moves)[0], 0, 1)
    cycle = .81 + np.cumsum(per_s) / SR  # engine cycles, starting partway through one
    levels_db = part_levels(per_s, throttle)
    levels_db[2] = levels_db[2] + in_time(drone_swell)[0]
    levels_db[3] = levels_db[3] + in_time(bark_swell)[0]
    hiss, flow = gas(cycle, per_s, throttle, levels_db[4:7])
    hiss = hiss + chirps(cycle, throttle)
    engine = pressure_waves(cycle, per_s, throttle, flow, levels_db[:4]) + hiss
    engine = engine + overrun_pops(throttle) + metal_tinks()
    around = ground(hiss) + wood(engine) + clatter_and_water(levels_db[7])
    return engine + clean_note(cycle, per_s) + around


def low_pass(x):
    """Removes everything above the highest recorded frequency."""
    return signal.sosfilt(signal.butter(12, 15260, fs=SR, output="sos"), x)


def record(dry):
    """The two microphone ports colour the sound differently; peaks are rounded and the top is cut."""
    # Each row: frequency in Hz, left level over right in dB.
    left_over_right = [(60, -7), (110, -5), (200, -4), (380, -3), (690, -3.5), (1270, -1.5), (2340, -1.5),
                       (4320, 4), (7960, 7), (14700, -5.5)]
    # Each row: frequency in Hz, phase by which left leads right in radians.
    left_leads = [(3100, 0), (4000, 3.5), (5300, 6.5), (8500, 13.5), (11000, 19.5), (15000, 26)]
    sides = np.array([[1], [-1]])  # half of each difference goes to each side
    tilt = from_db(at_hz(left_over_right) / 2 * sides)
    phase_lead = np.exp(.5j * at_hz(left_leads) * sides)
    x = irfft(rfft(dry) * tilt * phase_lead, N)
    x = signal.sosfilt(signal.butter(3, 46, "high", fs=SR, output="sos"), x)
    rounded = 0.96 * np.tanh(x / 1.071)
    x = signal.sosfilt(signal.cheby2(12, 70, 15100, fs=SR, output="sos"), rounded)
    return low_pass(np.clip(x, -1, 1))


dry = scene()
out = record(dry)
transcribe(out)
```